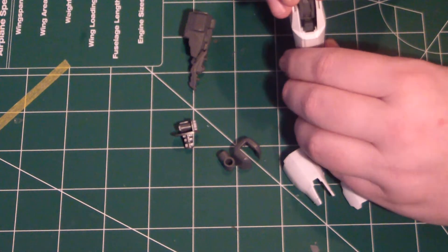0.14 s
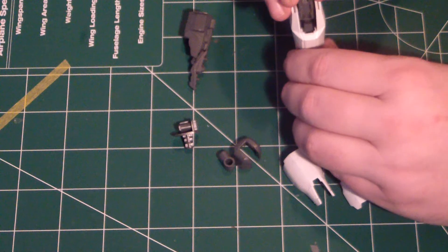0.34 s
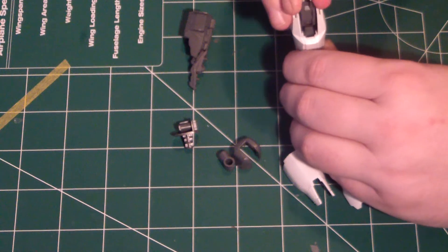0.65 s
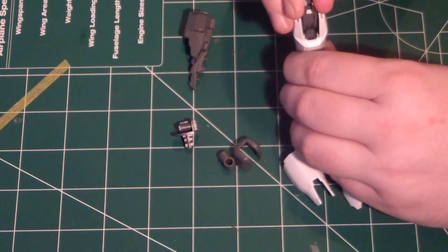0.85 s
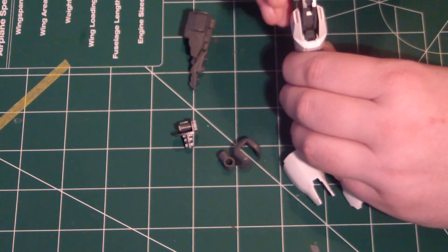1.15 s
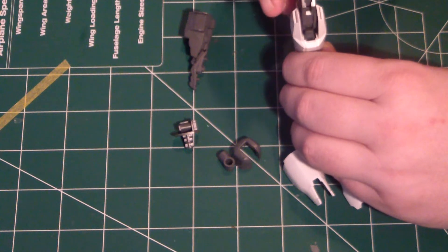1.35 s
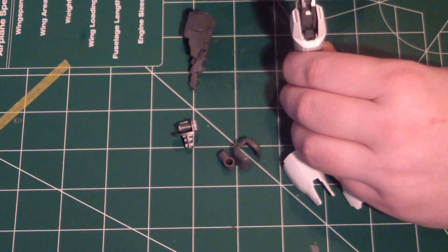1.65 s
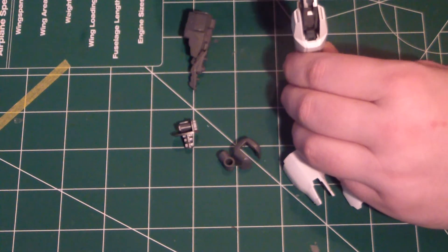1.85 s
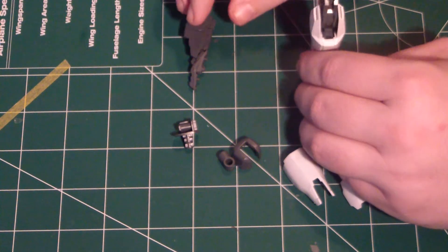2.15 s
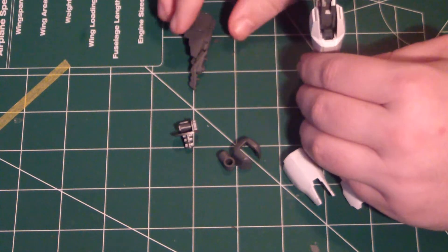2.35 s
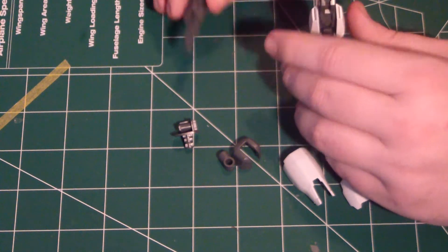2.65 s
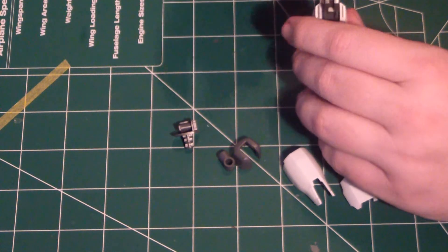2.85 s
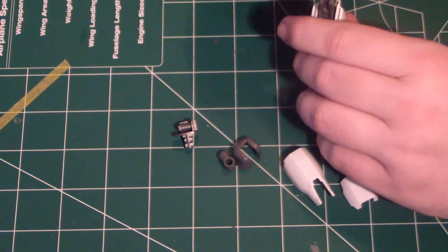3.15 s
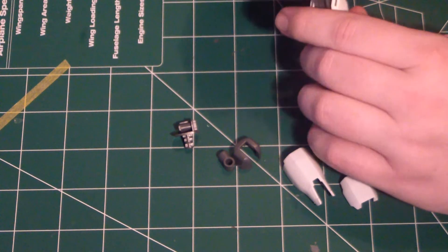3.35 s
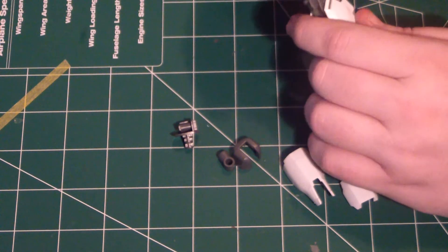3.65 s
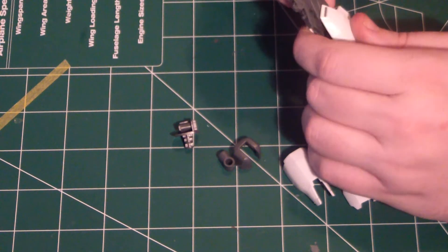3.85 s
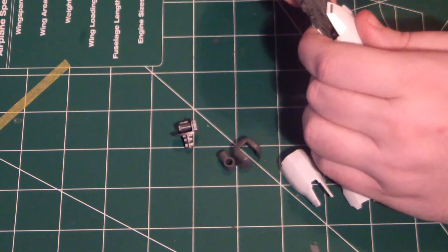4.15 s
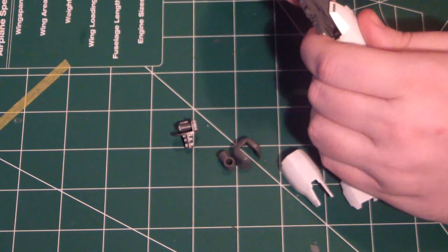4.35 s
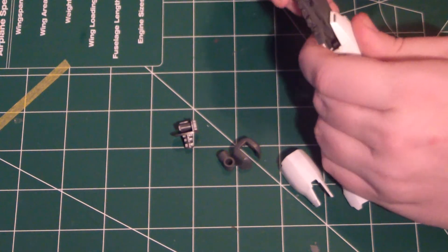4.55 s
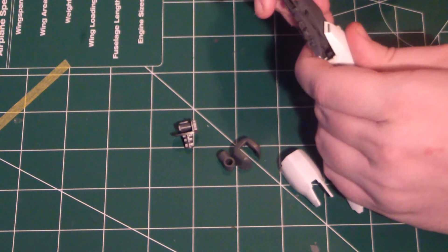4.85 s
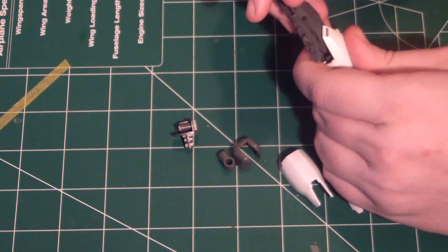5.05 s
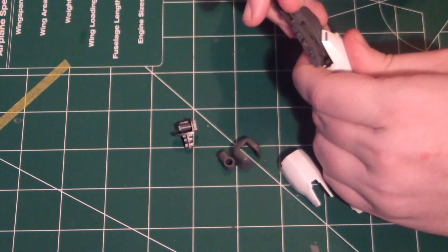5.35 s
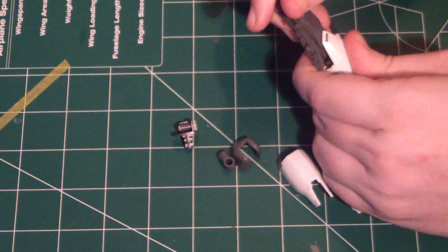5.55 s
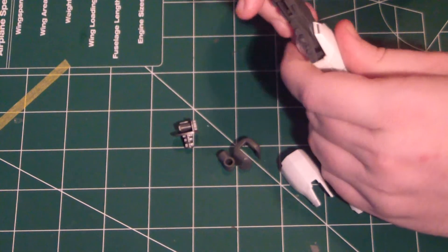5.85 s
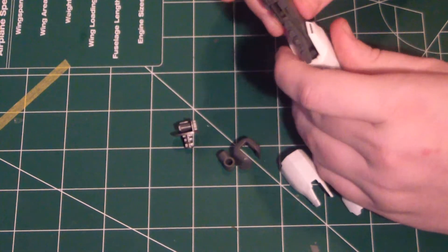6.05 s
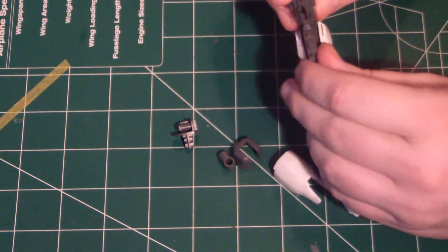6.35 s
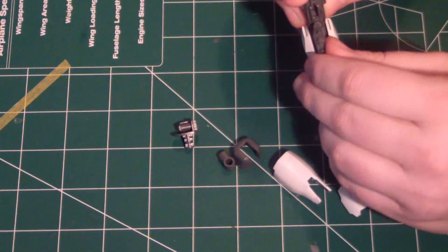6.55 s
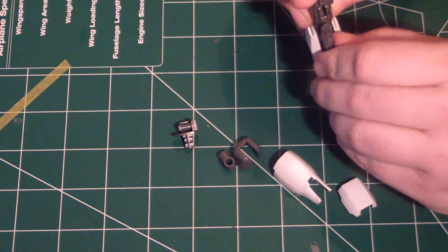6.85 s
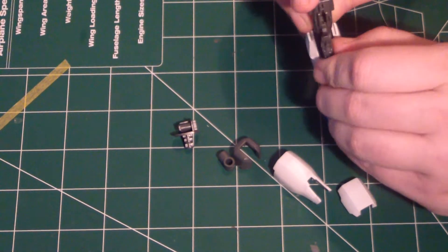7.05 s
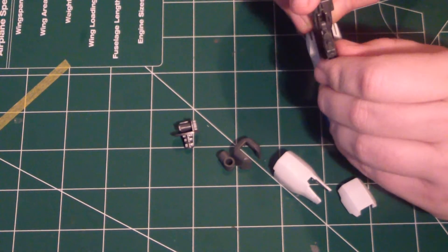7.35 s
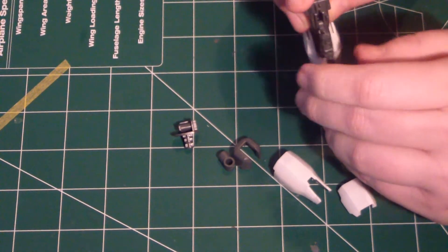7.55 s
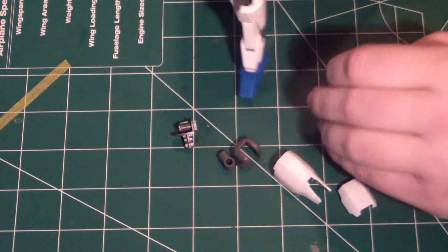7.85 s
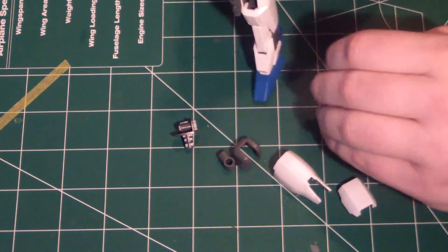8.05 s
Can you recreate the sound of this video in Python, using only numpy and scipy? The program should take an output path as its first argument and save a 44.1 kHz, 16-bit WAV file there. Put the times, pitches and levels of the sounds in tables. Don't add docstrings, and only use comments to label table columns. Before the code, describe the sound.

A small quiet room, heard close and in stereo, with a short dull reflection and a steady low mains hum, soft hiss and faint high whine. Light plastic taps and a rub lead to a very sharp snap at 0.24 s, a clack at 0.5 and another loud snap at 0.6 with a brief hollow ring. From 1 to 3 s it is quieter: a small click at 1.1, soft knocks and grainy rubbing on the mat around 2 to 2.5. From 3 to 5 s thin clicks and edge ticks come and go, with a little cluster near 3.4. A bright snap at 5.2 and the hardest at 5.44 jolt the desk, with dull thumps to 5.8. Stuttering, woody judders run at 6.2 to 6.3 and 6.7 to 6.85, ending in a crisp snap. After near stillness, a soft tap at 8 s and a short raspy scrape as the part drags across the mat.

```python
import sys
import numpy as np
from scipy import signal
from scipy.fft import rfft, irfft
from scipy.io import wavfile
from scipy.ndimage import uniform_filter1d

SR = 44100
rng = np.random.default_rng(int(sys.argv[2]) if len(sys.argv) > 2 else 0)


def magnitude_from_level(level_db):
    exponent = np.asarray(level_db, float) / 20
    return 10 ** exponent


def persist_wave(psi):
    counts = np.round(np.clip(psi, -1, 1) * 32767).astype(np.int16)
    wavfile.write(sys.argv[1], SR, np.atleast_2d(counts).T)


N = 361619


def rms_one(x):
    return x / np.sqrt(np.mean(x ** 2) + 1e-20)


def at_hz(points, hz):
    table_hz, value = np.transpose(points)
    return np.interp(np.log(hz), np.log(table_hz), value)


def resonate(x, hz, width_hz):
    r = np.exp(-np.pi * width_hz / SR)
    poles = [1, -2 * r * np.cos(2 * np.pi * hz / SR), r * r]
    return signal.lfilter(np.array([1, 0, -1]) * (1 - r * r) / 2, poles, x)


def body(x, peaks, spread_db=0):
    spread_db = spread_db + np.zeros(len(peaks))
    total = 0
    for k, ((hz, width_hz, db), extra_db) in enumerate(zip(peaks, spread_db)):
        total = total + (-1) ** k * magnitude_from_level(db + extra_db) * resonate(x, hz, width_hz)
    return total


def band(x, low_hz, high_hz):
    return signal.sosfilt(signal.butter(2, [low_hz, high_hz], "band", fs=SR, output="sos"), x)


def add(out, s, sound, pan_db, lag=0):
    at = round(s * SR)
    pair = sound + np.array([[lag / 2], [-lag / 2]]) * np.gradient(sound)
    out[:, at:at + len(sound)] += pair[:, :N - at] * magnitude_from_level(np.array([[pan_db / 2], [-pan_db / 2]]))


# [f/Hz, level/dB rms]
HUM = [(60, -46), (120, -61.5), (180, -58.5), (240, -70.5), (300, -66.5), (360, -69.5), (420, -70.5),
       (480, -78), (540, -82)]


def hum():
    line_hz = HUM[0][0]
    turn = 2 * np.pi * (line_hz * np.arange(N) / SR + rng.random())
    total = np.zeros(N)
    for k, (hz, db) in enumerate(HUM):
        behind = np.pi / 2 if k else 0
        total += np.sqrt(2) * magnitude_from_level(db) * np.cos(round(hz / line_hz) * turn - behind)
    return total


# [f/Hz, level/dB per Hz]
HISS = [(15, -11.5), (30, -11.5), (60, -9.5), (110, -11), (200, -15.5), (350, -20.5), (700, -23.5),
        (1700, -28.5), (3000, -28), (6000, -32.5), (10000, -33), (14000, -35.5), (15750, -32), (15950, -61)]
# [f/Hz, likeness 0..1]
LIKENESS = [(60, 0.26), (180, 0.25), (550, 0.15), (1650, 0.11), (4970, 0.015), (15000, 0.094)]
# [f/Hz, width/Hz, level/dB]
WHINE = (3270, 110, -68)
# [t/s, level/dB]
WHINE_EASES = [
    (6.2, 1),
    (6.6, -5),
]
HISS_DB = -53


def hiss():
    hz = np.maximum(np.fft.rfftfreq(N, 1 / SR), 1)
    alike = np.clip(at_hz(LIKENESS, hz), 0, 1)
    mid, side, narrow = rng.standard_normal((3, N))
    both = np.sqrt(1 + alike) * rfft(mid) + np.sqrt(1 - alike) * rfft(side) * np.array([[1], [-1]])
    noise = irfft(both * magnitude_from_level(at_hz(HISS, hz)), N)
    noise = noise / np.std(band(noise, 500, 16000))
    whine_hz, width_hz, whine_db = WHINE
    ease_db = np.interp(np.arange(N) / SR, *np.transpose(WHINE_EASES))
    whine = magnitude_from_level(whine_db + ease_db) * rms_one(resonate(narrow, whine_hz, width_hz))
    return magnitude_from_level(HISS_DB) * noise + whine


ROOM_T60_S, ROOM_DB, ECHO_S, ECHO_DB = 0.11, -5.5, 0.011, -18.5
WALL_LOSS = 0.38
BOOM_CUT_HZ, AIR_CUT_HZ = 290, 13800


def room(x):
    t = np.arange(int(0.4 * SR)) / SR
    decay = magnitude_from_level(-60 * t / ROOM_T60_S) * (1 - np.exp(-t / 0.00099))

    def evenly_coloured(spectrum):
        smooth = np.sqrt(uniform_filter1d(np.abs(spectrum) ** 2, size=150))
        return irfft(spectrum / smooth, len(t)) * (t < 0.3)

    mid, side = [evenly_coloured(v) for v in rfft(rng.standard_normal((2, len(t))) * decay)]
    tail = (mid + 0.16 * side * np.array([[1], [-1]])) * magnitude_from_level(ROOM_DB)
    tail[:, round(ECHO_S * SR)] += magnitude_from_level(ECHO_DB)
    dull = signal.lfilter([1 - WALL_LOSS], [1, -WALL_LOSS], tail)
    dull = signal.lfilter(*signal.butter(2, [BOOM_CUT_HZ, AIR_CUT_HZ], "band", fs=SR), dull)
    return signal.fftconvolve(x, dull, axes=1)[:, :N]


# [middle t/s, length/s, hiss level/dB, body level/dB, rumble level/dB]
RUBS = [(0.11, 0.15, -55, -59.5, -57), (1.918, 0.25, -60, -58.5, -58.5), (2.018, 0.056, -58, -47.5, -53),
        (2.091, 0.072, -52, -55, -58), (2.164, 0.33, -61.5, -54.5, -55.5), (2.54, 0.065, -58, -55.5, -51),
        (2.755, 0.25, -65, -77, -77), (2.888, .06, -60, -75, -58), (3.33, 0.089, -54.5, -62, -79),
        (3.694, 0.36, -58, -64.5, -79), (4.516, 0.2, -51, -62, -74), (5.677, 0.49, -64, -60.5, -61),
        (5.865, 0.099, -58, -60, -66), (5.997, .14, -59.5, -72, -69), (6.101, 0.23, -56.5, -51.5, -61)]
# [f/Hz, width/Hz, level/dB]
RUB_PEAKS = [(6000, 8300, 0), (9000, 2800, 4.5), (11800, 2800, 0.5), (15100, 1600, -2.5)]
# [f/Hz, width/Hz, level/dB]
RUB_BODY = [(1300, 970, -1), (1950, 690, 2), (3200, 1300, -7), (4630, 660, -9)]
# [t/s, level/dB]
DRAG = [
    (8.07, -76),
    (8.116, -31.5),
    (8.136, -27.5),
    (8.18, -29),
    (8.2, -32),
]
# [f/Hz, width/Hz, level/dB]
DRAG_PEAKS = [(970, 1000, -18), (2490, 190, -6.5), (3300, 720, -12), (4760, 590, -7.5), (6100, 3500, -14),
              (8550, 270, 4.5), (10400, 710, -4), (11900, 1100, -6.5), (14300, 730, -10)]
STROKE_SHARPNESS = 1.37


def rubs():
    unevenness_db = 4.3 * np.minimum(rng.exponential(1, (4, N)), 4)
    grains = rng.standard_normal((4, N)) * magnitude_from_level(unevenness_db)
    layers = body(grains[0], RUB_PEAKS), body(grains[1], RUB_BODY), band(grains[2], 230, 610)
    layers = np.array([rms_one(layer) for layer in layers])
    t = np.arange(N) / SR
    drag_db = np.interp(t, *np.transpose(DRAG), left=-200)
    out = rms_one(body(grains[3], DRAG_PEAKS)) * magnitude_from_level(drag_db)
    for middle_s, length_s, *levels_db in RUBS:
        phase = np.clip((t - middle_s) / length_s, -0.5, 0.5)
        pressure = np.cos(np.pi * phase) ** STROKE_SHARPNESS
        out += pressure * (magnitude_from_level(np.array(levels_db)) @ layers)
    return out * magnitude_from_level(np.array([[-0.3], [0.3]]))


# [t/s, f/Hz, peak level/dB, t60/s]
CREAKS = [(0.609, 4660, -7, 0.0054), (2.306, 1330, -40, 0.11), (2.84, 700, -45.5, 0.058),
          (2.941, 1260, -46.5, 0.11), (3.204, 1300, -47.5, 0.13), (3.364, 1100, -38, 0.052),
          (3.363, 2000, -31.5, 0.036), (3.315, 9800, -46, 0.056), (3.616, 2080, -42, 0.14),
          (0.2356, 11600, -22, 0.0052), (1.125, 805, -44, 0.07), (2.546, 910, -43, 0.081),
          (5.233, 5380, -19.5, 0.034), (6.074, 1960, -37.5, 0.22), (6.1, 10000, -45, .08),
          (6.345, 2400, -45, 0.02), (0.6077, 13660, -4, 0.004), (.615, 154, -38, 0.96),
          (2.715, 9600, -43.5, 0.092), (2.775, 9600, -45.5, 0.099), (3.31, 14000, -43, 0.2),
          (5.443, 9000, -22, 0.0074), (5.445, 142, -33.5, 0.19), (5.449, 45, -29, 0.26),
          (6.822, 3600, -28, 0.047)]


def creaks():
    out, t = np.zeros((2, N)), np.arange(9000) / SR
    for (s, hz, peak_db, t60), noise in zip(CREAKS, rng.standard_normal((len(CREAKS), len(t)))):
        tone = resonate(noise * magnitude_from_level(-60 * t / t60), hz, width_hz=25 + 0.057 * hz)
        add(out, s, magnitude_from_level(peak_db) * tone / np.abs(tone).max(), -1.2)
    return out


LEAD_IN_S = 0.00042


def let_go(hz, t60, turns=0):
    t = np.arange(11000) / SR - 0.002
    envelope = np.where(t < 0, np.exp(-(t / LEAD_IN_S) ** 2 / 2), magnitude_from_level(-60 * t / t60))
    return -np.cos(2 * np.pi * (hz * t + turns)) * envelope


# [t/s, f/Hz, peak level/dB, t60/s]
LOW_RINGS = [(.5158, 1125, -30, .053), (.5158, 495, -32, .055), (.5158, 700, -33, .07),
             (.607, 420, -12, .008), (.607, 727, -27, .12), (.607, 1120, -26, .11), (.607, 1319, -22, .08),
             (.607, 1507, -21, .06), (.607, 200, -19, .03), (.613, 300, -23, .05), (.62, 1250, -28, .05),
             (1.1085, 450, -39, .02), (1.1085, 900, -44, .015), (1.119, 452, -33, .05),
             (1.119, 1114, -42, .05), (1.146, 170, -41, .03), (1.752, 1950, -46, .03),
             (1.86, 640, -49, .04), (1.889, 654, -46, .1), (1.92, 660, -47, .1), (2.079, 280, -42, .1),
             (2.095, 450, -44, .07), (2.125, 760, -46, .05), (2.14, 290, -43, .08), (2.157, 445, -35, .08),
             (2.3, 1700, -40, .06), (2.483, 2100, -38, .025), (2.483, 950, -39, .05),
             (2.535, 1050, -46, .06), (6.194, 2100, -32, .02), (6.194, 800, -32, .012),
             (6.29, 120, -39, .3), (6.85, 68, -37, .2), (5.77, 150, -38, .12), (.607, 950, -18, .005),
             (2.17, 1300, -46, .04), (2.09, 2100, -48, .03), (6.322, 2110, -43, .016)]
# [t/s, f/Hz, peak level/dB, t60/s]
HIGH_RINGS = [(.0125, 4630, -46, .02), (.135, 3430, -44, 0.014), (.2375, 15100, -8, .008),
              (.2375, 3600, -29, 0.026), (0.2473, 4730, -25, 0.033), (.2485, 3600, -32, .05),
              (.275, 4500, -35, 0.016), (.6078, 2960, -22, 0.0047), (1.118, 2900, -42, .01),
              (1.753, 6600, -43, .015), (3.363, 13700, -28, .012), (3.363, 15500, -33, .012),
              (3.363, 9700, -26, .015), (3.369, 13600, -32, .012), (3.369, 9600, -27, .015),
              (3.369, 15400, -34, .01), (3.376, 9600, -25, 0.03), (3.378, 13700, -37, .03),
              (5.445, 15400, -17, .006), (5.4443, 6000, -15.5, .008), (5.4445, 5200, -18, .012),
              (5.445, 1590, -27, .01), (.2372, 15700, -14, .006), (.609, 8800, -13, 0.0055),
              (.07, 2700, -30, .01), (.08, 3800, -38, .02), (5.444, 7530, -25, .06), (7.98, 8600, -48, .04)]
TWIN_RATIO, TWIN_DB = 1.06, -6.5


def rings():
    out = np.zeros((2, N))
    for s, hz, peak_db, t60 in LOW_RINGS + HIGH_RINGS:
        twin_hz = hz * TWIN_RATIO ** (1 if hz < 3000 else 0.5)
        pair = let_go(hz, t60) + magnitude_from_level(TWIN_DB) * let_go(twin_hz, t60)
        add(out, s - 0.002, magnitude_from_level(peak_db - 4.0) * pair, -1.5)
    return out


DESK_PAN_DB = -2.3
# [t/s, pressure dip level/dB, hardness/dB, depth/dB]
JUDDERS = [(6.1667, -27, 2, 10), (6.188, -18, 1, 2), (6.1954, -24, -3, 5), (6.2054, -17, 4, 1),
           (6.2439, -14, 7.5, 2), (6.2704, -15.5, 9, 0), (6.7384, -17, 1, 2.5), (6.7623, -16.5, 4, -5),
           (6.7827, -16, 3, -1), (6.8124, -15, 2, 2), (6.8298, -17, 3, -1), (6.8475, -15.5, 1, -2.5)]
# [f/Hz, level/dB, t60/s]
LOADED_DESK = [(65, -18, .12), (111, -11.5, 0.096), (157, -4, 0.084), (215, -12.5, 0.03), (275, -7, 0.038),
               (333, -3.5, .035), (406, -6.5, .03), (480, -13.5, 0.055), (600, -15.5, 0.016),
               (750, -13, .025), (1030, -18.5, 0.035), (1360, -16.5, 0.03), (1720, -13, 0.017),
               (2030, -21, .01)]
HEAVY_HZ = 290


def judders():
    out = np.zeros((2, N))
    hz, mode_db, t60 = np.transpose(LOADED_DESK)[:, :, None]
    grips = rng.standard_normal((len(JUDDERS), len(hz), 1))
    for (s, dip_db, hard_db, deep_db), grip in zip(JUDDERS, grips):
        tilt_db = np.interp(np.log(hz), np.log([170, 290, 600, 1100]), [deep_db, 0, 0, hard_db])
        modes = let_go(hz * (1 + 0.04 * grip), t60, turns=(hz < HEAVY_HZ) / 4)
        jolt = np.sum(magnitude_from_level(mode_db + tilt_db) * modes, axis=0)
        add(out, s - 0.002, magnitude_from_level(dip_db - 7.0) * jolt, DESK_PAN_DB)
    return out


# [t/s, peak level/dB, hardness/dB, depth/dB]
TAPS = [(0.069, -16.5, -18, -29), (0.075, -25, -26, -13), (0.172, -29, -11, -23), (0.217, -21, -12.5, -27),
        (0.2355, -14, -10, -9.5), (0.401, -25.5, -7.5, -15), (0.514, -14.5, -6.5, -23),
        (0.52, -24, -24, -12), (0.605, -8, -11, -13.5), (0.978, -37, -7, -21), (1.03, -38.5, -18, -17),
        (1.117, -29.5, -14, -19), (1.279, -37.5, -13, -19), (1.747, -41, -23, -5), (2.011, -28.5, -19, -29),
        (2.078, -43, -20, -33), (2.156, -36, -21, -27), (2.298, -37.5, 4, -16), (2.475, -36, 3.5, -15),
        (2.482, -31, -29, -22), (2.546, -46.5, 5.5, -12), (3.082, -39.5, -4, -35), (4.291, -45, 2, -5),
        (7.975, -29, -24, -8), (8.153, -26.5, -21, -14)]
# [t/s, peak level/dB, hardness/dB, depth/dB]
THUMPS = [
    (5.443, -32, 3.5, 14),
    (5.492, -30.5, -6.5, -2),
    (5.749, -34.5, -11, 6),
    (5.767, -24, -18, 0.5),
    (5.848, -49.5, 3.5, -9),
    (6.629, -34, -17, -10),
]
# [f/Hz, level/dB, t60/s]
DESK = [(45, -18, 0.98), (112.5, -12, 0.23), (156.3, -3, 0.17), (230, 1.5, 0.032), (288, 1.5, 0.057),
        (338, -4.5, 0.049), (389, 11, 0.013), (437, 3, 0.041), (570, 1, 0.029), (698, 10, 0.022),
        (1060, 8, 0.0085), (1120, -7, 0.055), (1383, 1.5, 0.024), (1853, -1, 0.024), (2085, 5, 0.0094)]
PUSH_DB, PUSH_S = -4.5, 0.00066
WRIST_HZ, WRIST_DAMPING = 200, 0.921
MAT_CUT_HZ = 2500


def knocks():
    out, t = np.zeros((2, N)), np.arange(9000) / SR
    hz, mode_db, t60 = np.transpose(DESK)[:, :, None]
    contact = 1 - np.exp(-(t / 0.00051) ** 2)
    push = t / PUSH_S - 2
    pressure = magnitude_from_level(PUSH_DB + 12.0) * (push - 0.2) * np.exp(-push ** 2 / 2)
    rows = [(*tap, 1) for tap in TAPS] + [(*thump, WRIST_DAMPING) for thump in THUMPS]
    luck = rng.standard_normal((len(rows), 2, len(DESK), 1))
    for (s, peak_db, hard_db, deep_db, wrists), (strength, load) in zip(rows, luck):
        tilts_db = [deep_db + 8.0, 0, 0, hard_db + 15.0]
        tilt_db = np.interp(np.log(hz), np.log([171, 285, 750, 1100]), tilts_db)
        decay_db = -60 * t * np.where(hz < WRIST_HZ, wrists, 1) / t60
        swing = -np.sin(2 * np.pi * hz * (1 + 0.03 * load) * t + np.pi / 3)
        modes = swing * magnitude_from_level(mode_db + tilt_db + 0.96 * strength + decay_db)
        sound = np.sum(modes, axis=0) * contact + pressure
        add(out, s + 0.001263, magnitude_from_level(peak_db - 16.0) * sound, DESK_PAN_DB)
    return signal.sosfilt(signal.butter(4, MAT_CUT_HZ, fs=SR, output="sos"), out)


def slips(noise, t, t60):
    spectrum = rfft(noise * (1 - np.exp(-(t / 0.00081) ** 2)) * magnitude_from_level(-60 * t / t60))
    even = irfft(spectrum / np.sqrt(uniform_filter1d(np.abs(spectrum) ** 2, size=50)), len(t))
    return even * (t < 2 * t60)


# [t/s, peak level/dB, loudest ring f/Hz, lower wall modes level/dB, upper wall modes level/dB]
SNAPS = [(0.2356, -3.5, 14300, -16, -10), (0.2478, -16, 3800, -20, -34), (0.6086, -4.5, 13000, -27, -9.5),
         (1.116, -28.5, 3400, -9.5, -15), (2.718, -44, 9650, -26, -4), (2.7761, -45, 9300, -18, -1),
         (3.0843, -22.5, 10800, -21, -14.5), (3.0918, -29, 9300, -12, -21),
         (3.3617, -21.5, 13900, -7.5, -1), (3.368, -23, 9900, -13, -9), (3.3766, -23.5, 9150, -13, -14),
         (4.291, -25.5, 3600, -20, -10), (4.525, -21.5, 8300, -12, -8), (4.798, -27.5, 3320, -5, -14),
         (5.233, -8.5, 8540, -26, -14), (5.4435, -3, 6500, -15.5, -10.5), (5.4927, -25.5, 3950, 4, -29),
         (5.7342, -25.5, 11300, -21, -13), (6.3442, -28.5, 8550, -20, -13), (6.821, -13.5, 8940, -17, -8.5)]
# [t/s, peak level/dB, loudest ring f/Hz, hollow level/dB]
CLACKS = [(0.0108, -35.5, 6000, -1), (0.0687, -26.5, 3280, -1.5), (0.5139, -24.5, 3370, 3),
          (0.577, -34, 3010, -5), (0.983, -40.5, 3160, -14), (1.75, -41, 6050, -3),
          (2.48, -28.5, 10100, -1.5), (2.899, -38, 3000, 1), (2.9145, -30.5, 9000, -6),
          (3.872, -43, 3300, -0.5), (4.919, -41, 3200, -5), (5.122, -38.5, 3300, -4.5),
          (5.7754, -34.5, 6600, -7), (5.8652, -37, 3730, -4), (6.1934, -20.5, 4150, -2),
          (6.2671, -37, 11400, 12.5), (6.324, -36, 9180, -5), (6.7347, -34.5, 3200, 1),
          (6.761, -36.5, 10000, 6), (6.782, -34, 3680, 2), (6.798, -43, 3120, -11), (6.81, -35.5, 3190, 12),
          (6.8463, -45, 9050, 14), (7.978, -41, 8550, 0.5)]
# [t/s, peak level/dB, loudest ring f/Hz, hollow level/dB]
TICKS = [(3.1505, -30.5, 11600, -23), (3.253, -31, 7900, -23), (3.4344, -42, 3180, -13),
         (3.615, -32.5, 3630, -9), (3.627, -35.5, 3740, -23), (3.657, -34.5, 5100, -24),
         (3.7, -38.5, 3320, -15), (4.464, -34, 8200, -26), (4.492, -31.5, 5740, -7),
         (4.873, -38.5, 3520, -14), (4.896, -34, 3530, -8.5), (5.01, -32, 3500, -9.5),
         (5.728, -29, 6600, -8), (6.242, -33.5, 11200, -14), (6.4546, -36.5, 6900, -6),
         (6.63, -35, 9100, -25), (7.5654, -38, 10700, -10)]
# [ring f/Hz, lower wall level/dB, upper wall level/dB]
LIGHT_WALLS = [(3300, -10.5, -14), (6500, -13, -16), (10000, -20, -15)]
# [f/Hz, width/Hz, level/dB]
PLASTIC = [(3600, 660, 4.5), (4884, 500, 5.5), (5164, 610, 5), (7510, 2110, 5.5), (8580, 1860, 8),
           (9600, 1230, 7.5), (11600, 1840, 3.5), (12500, 1600, 3.5), (13900, 940, 3), (15400, 1100, -6)]
# [f/Hz, width/Hz, level/dB]
HOLLOW = [(1040, 1100, -5), (1440, 720, 4), (2000, 255, 5), (2440, 400, -3.5)]
SNAP_HOLLOW_DB = -29
SOFT_T60_S, HARD_T60_S = 0.02, 0.005


def snaps():
    out, t = np.zeros((2, N)), np.arange(4000) / SR
    ring, low, high = np.transpose(LIGHT_WALLS)
    rows = [(s, db, hz, SNAP_HOLLOW_DB, lower_db, upper_db) for s, db, hz, lower_db, upper_db in SNAPS]
    for s, db, hz, hollow_db in CLACKS + TICKS:
        rows.append((s, db, hz, hollow_db, np.interp(hz, ring, low), np.interp(hz, ring, high)))
    grit, luck = rng.standard_normal((len(rows), len(t))), rng.standard_normal((len(rows), 2))
    wall_hz = np.array(PLASTIC)[:, 0]
    lower, upper = wall_hz < 6500, wall_hz > 11000
    for (s, peak_db, ring_hz, hollow_db, lower_db, upper_db), noise, chance in zip(rows, grit, luck):
        burst = slips(noise, t, np.interp(peak_db, [-30, -5], [SOFT_T60_S, HARD_T60_S]))
        walls = body(burst, PLASTIC, lower * (lower_db + 14.0) + upper * (upper_db + 12.5))
        bright = walls + magnitude_from_level(4.0) * resonate(burst, ring_hz, width_hz=300)
        both = rms_one(bright) + magnitude_from_level(hollow_db) * rms_one(body(burst, HOLLOW))
        add(out, s, magnitude_from_level(peak_db - 23.5) * both, -1.1 + 0.9 * chance[0], lag=0.71 + 0.3 * chance[1])
    return out


DESK_ROOM_DB, JUDDER_ROOM_DB = -2, -3
TOP_HZ = 16150


def scene():
    floor = hum() + hiss()
    airborne = rubs() + creaks() + rings()
    jolts, desk, clicks = judders(), knocks(), snaps()
    heard = room(clicks + airborne + magnitude_from_level(DESK_ROOM_DB) * desk + magnitude_from_level(JUDDER_ROOM_DB) * jolts)
    rest = airborne + desk + jolts + heard + floor
    return clicks + signal.sosfilt(signal.cheby2(14, 60, TOP_HZ, fs=SR, output="sos"), rest)


def top_cut(x):
    return signal.sosfilt(signal.butter(12, 16790, fs=SR, output="sos"), x)


def record(dry):
    mix = np.clip(dry, -1, 1)
    return top_cut(mix)


dry = scene()
out = record(dry)
persist_wave(out)
```